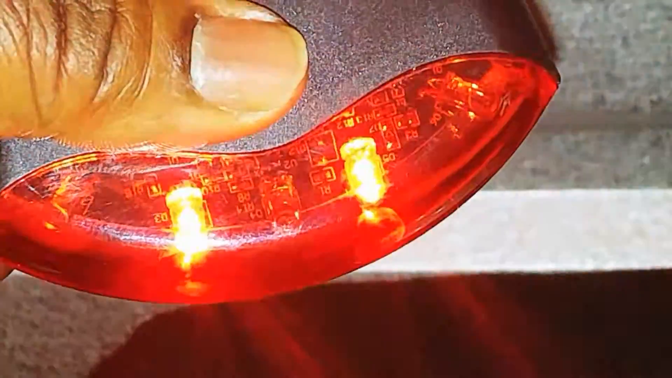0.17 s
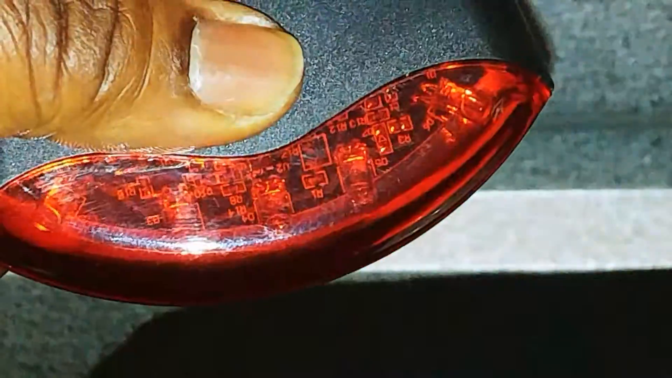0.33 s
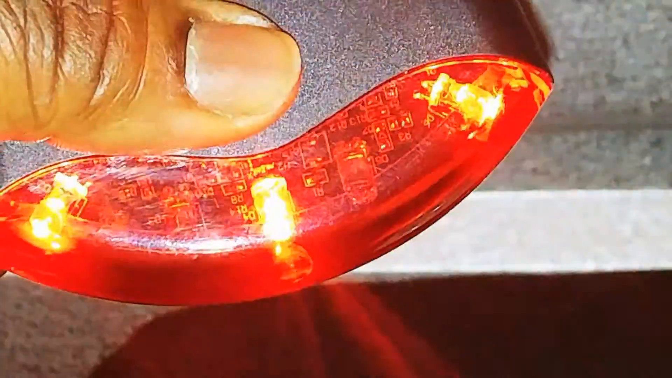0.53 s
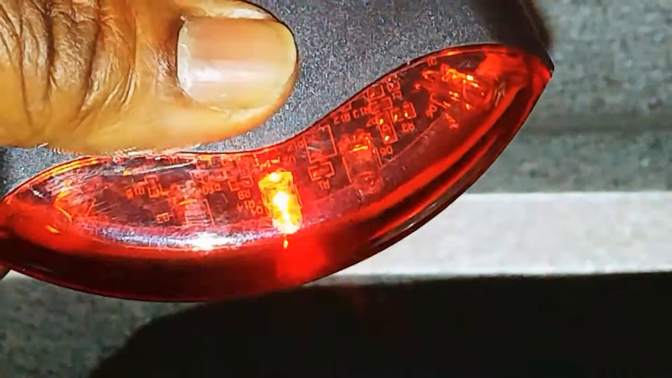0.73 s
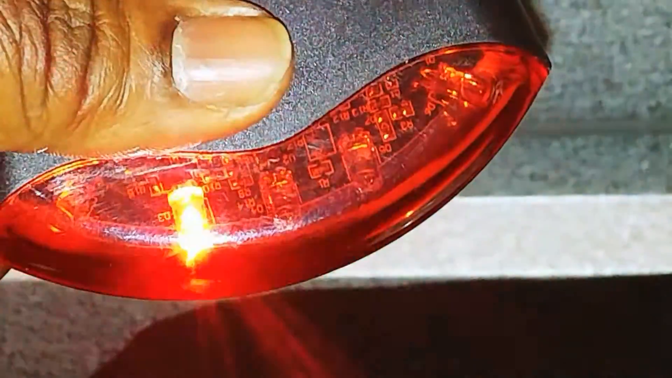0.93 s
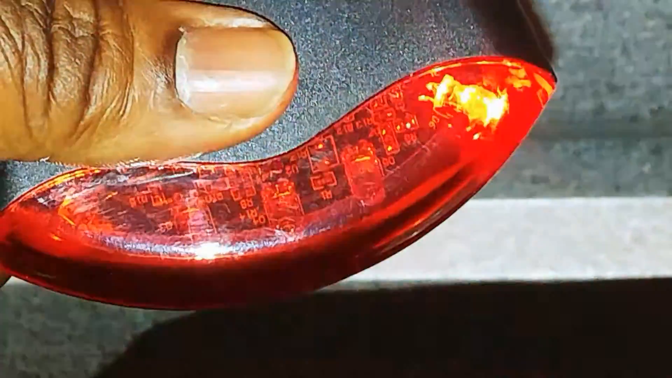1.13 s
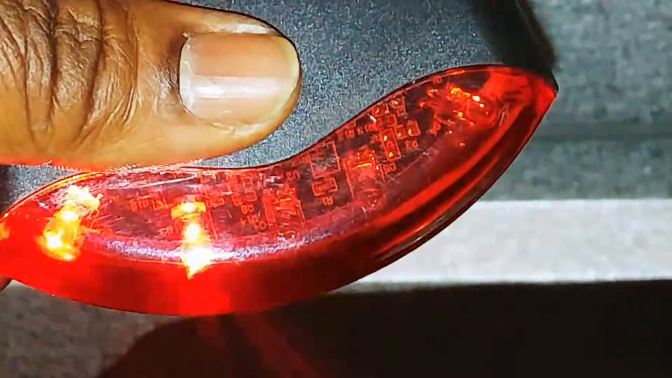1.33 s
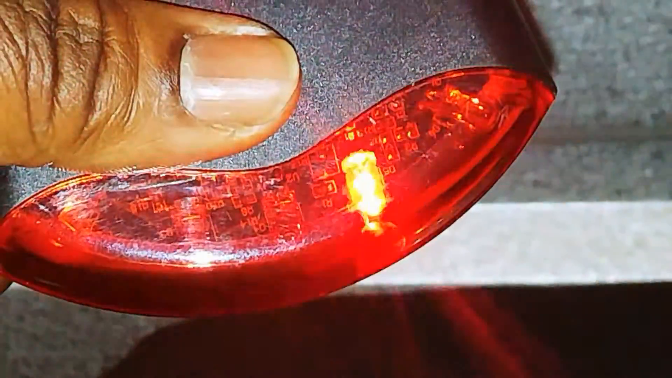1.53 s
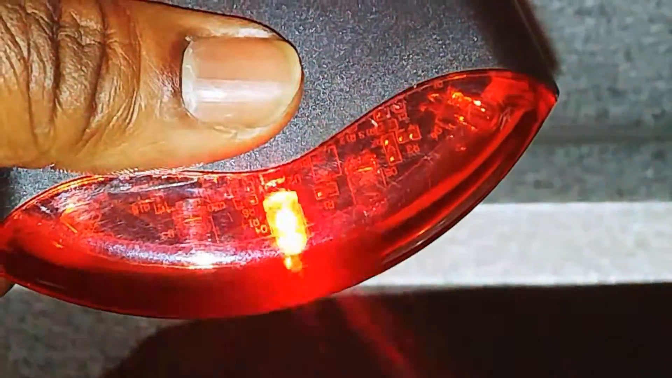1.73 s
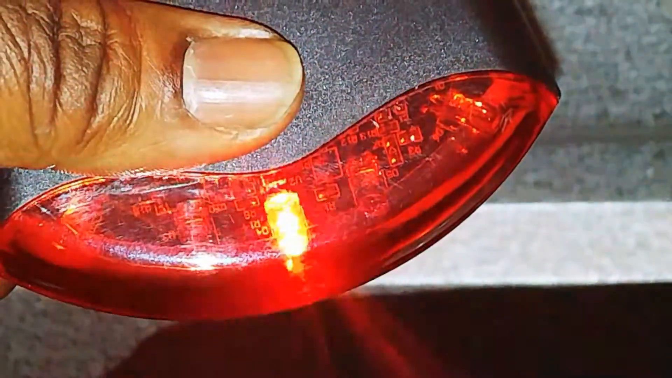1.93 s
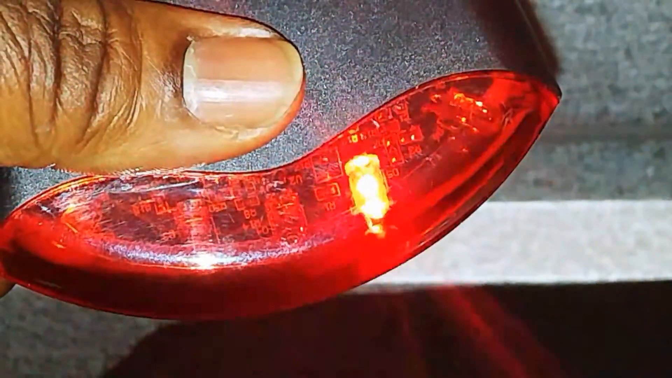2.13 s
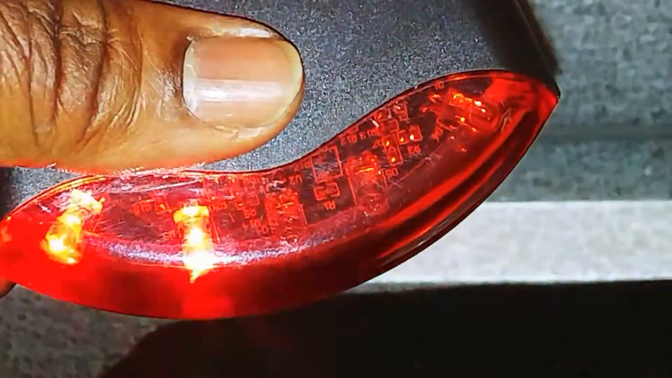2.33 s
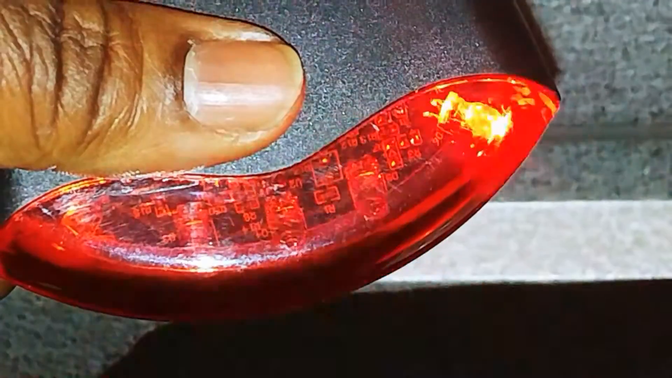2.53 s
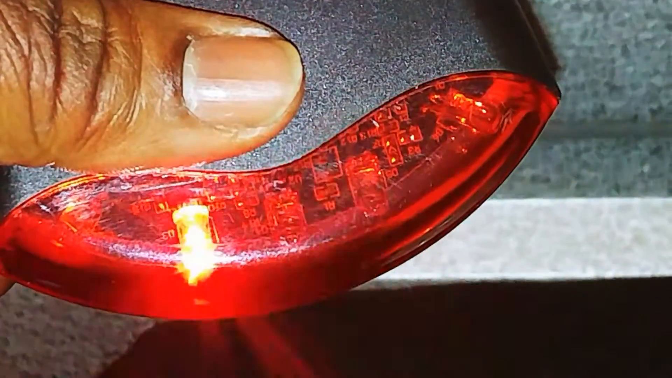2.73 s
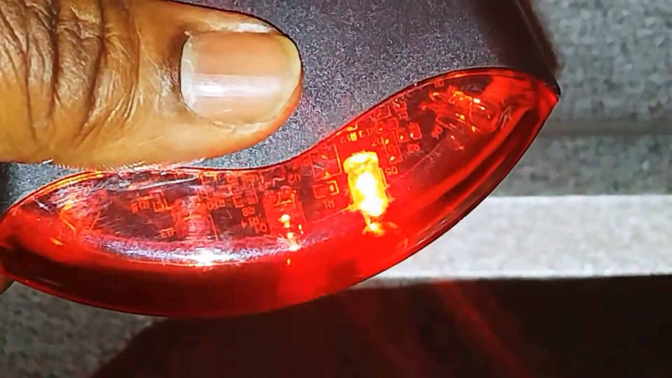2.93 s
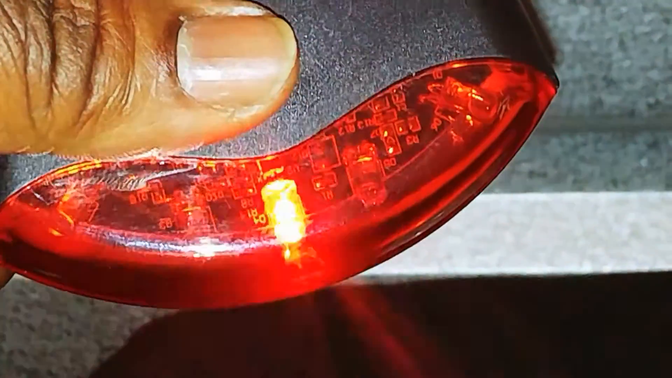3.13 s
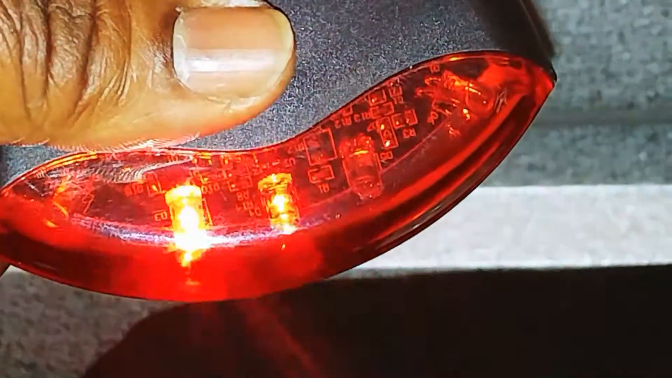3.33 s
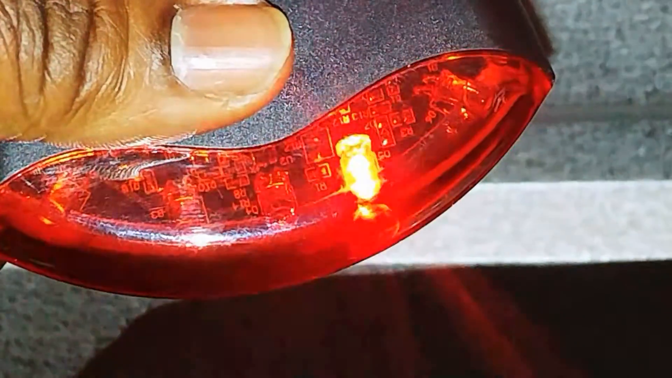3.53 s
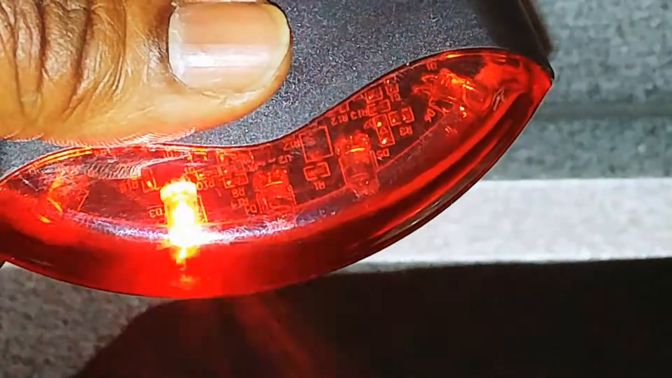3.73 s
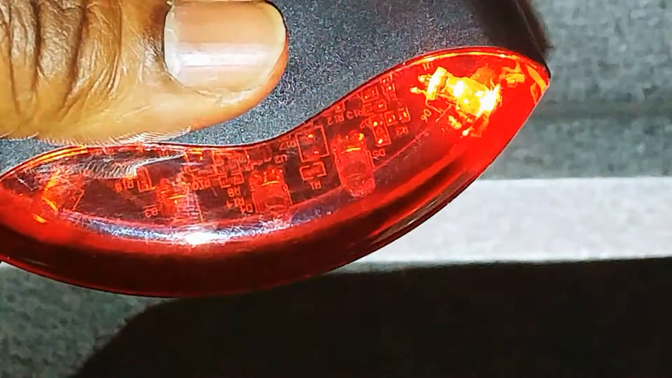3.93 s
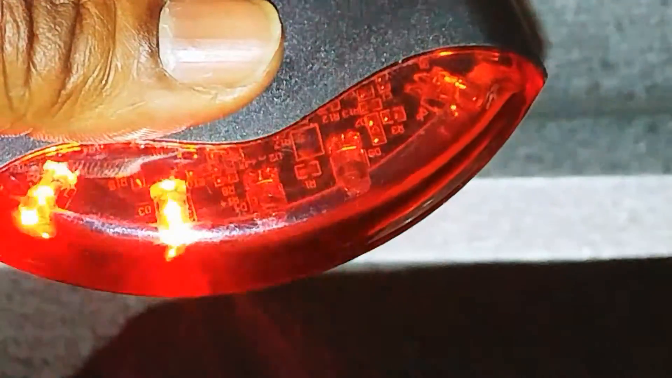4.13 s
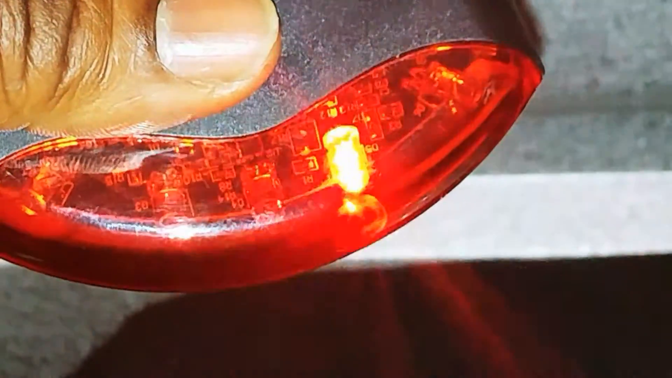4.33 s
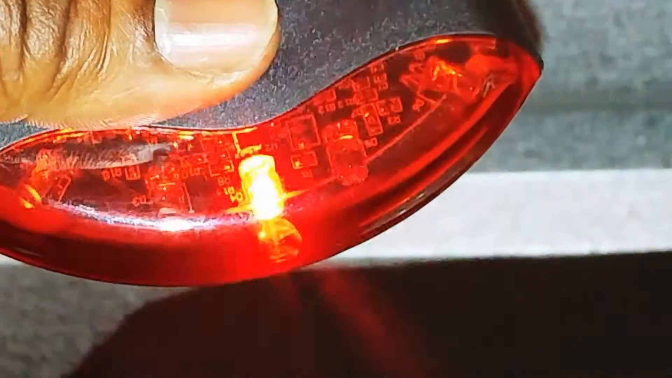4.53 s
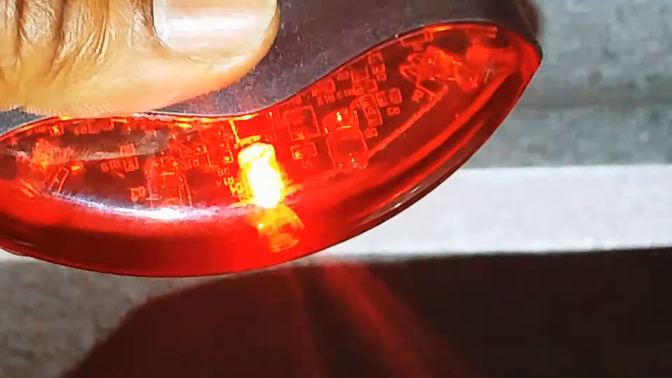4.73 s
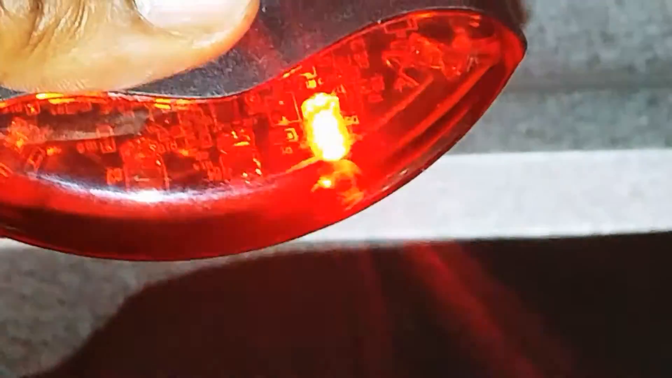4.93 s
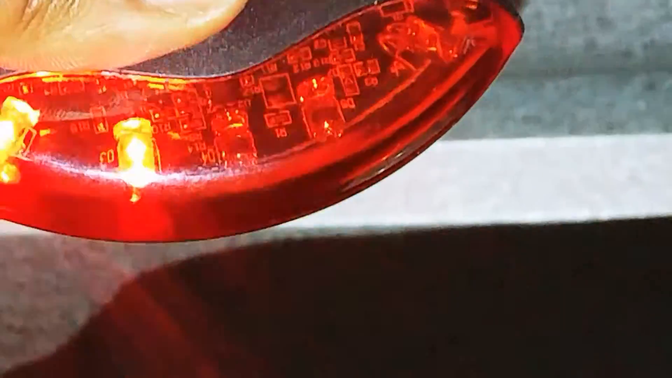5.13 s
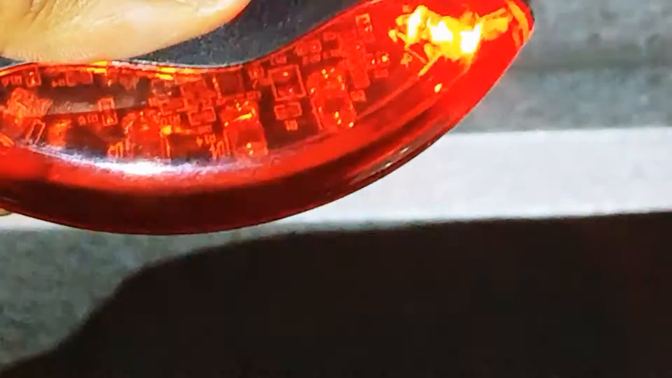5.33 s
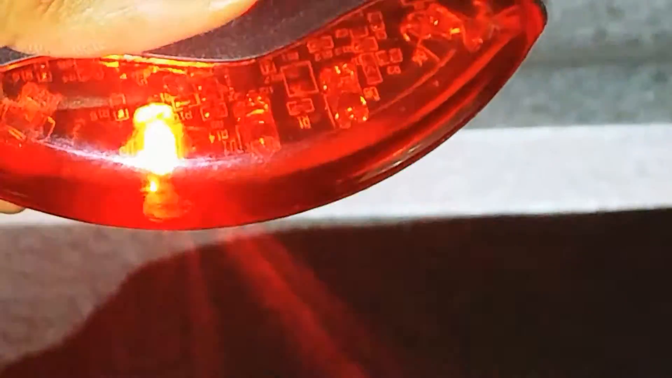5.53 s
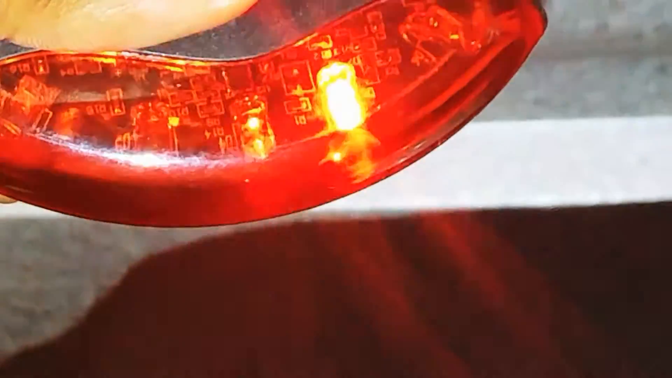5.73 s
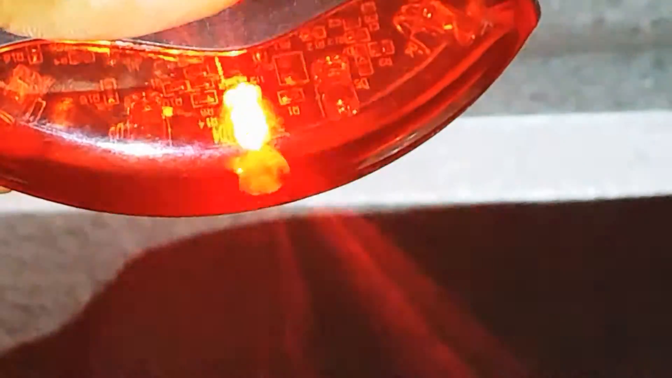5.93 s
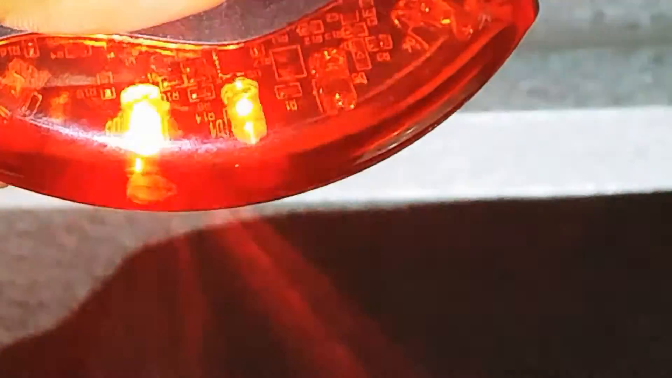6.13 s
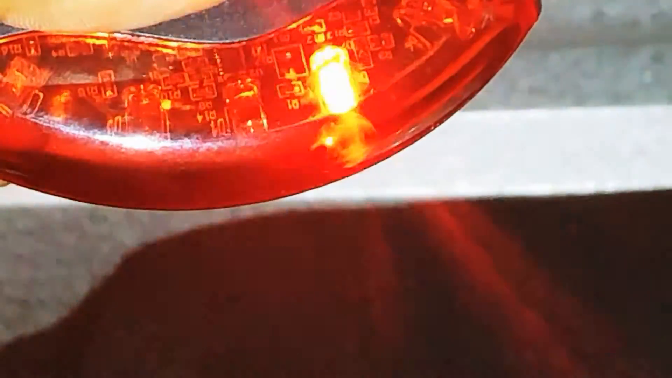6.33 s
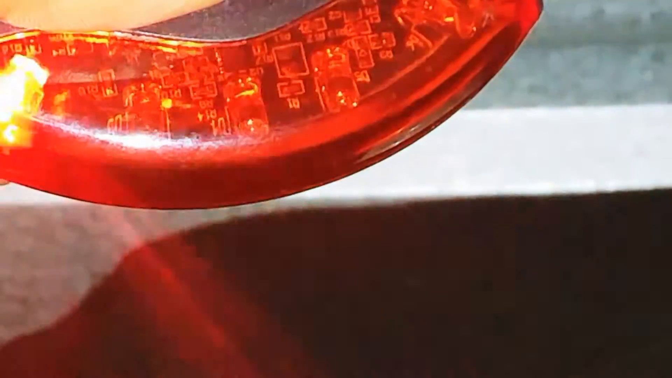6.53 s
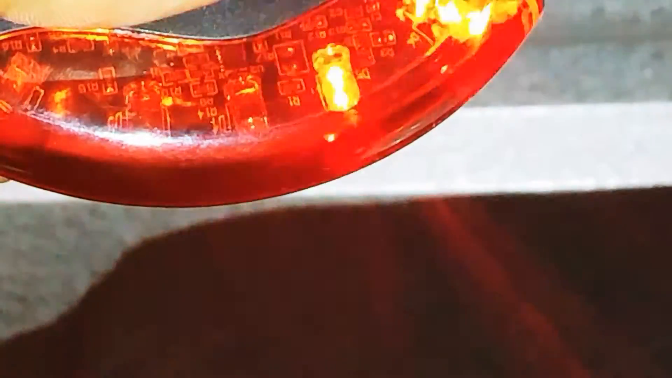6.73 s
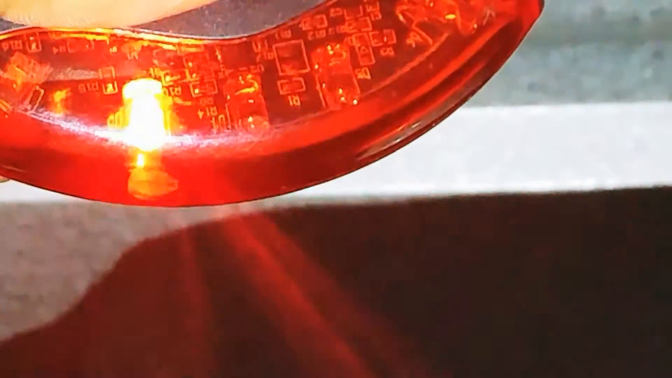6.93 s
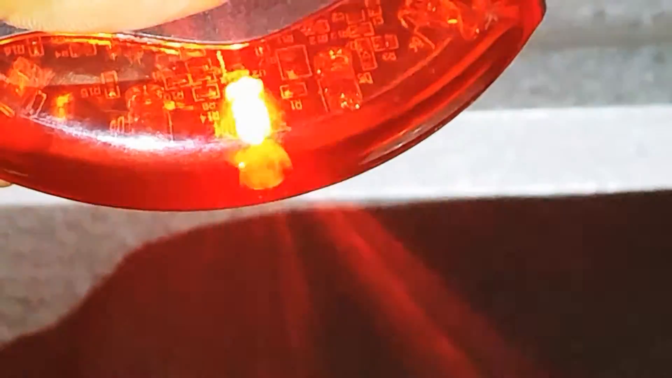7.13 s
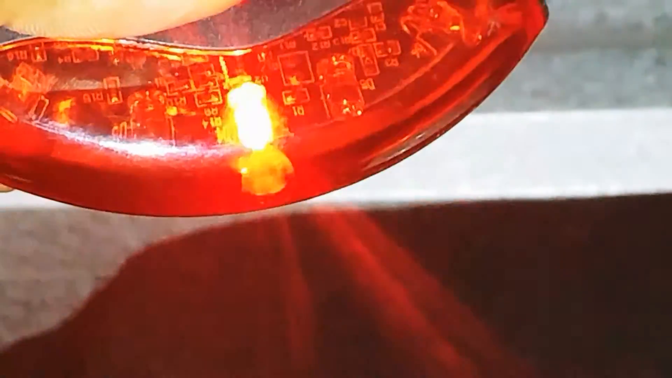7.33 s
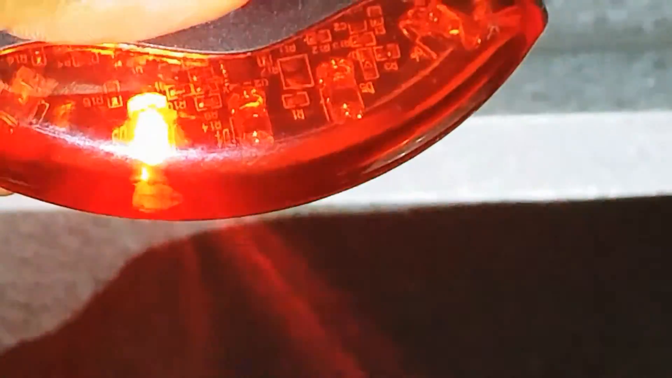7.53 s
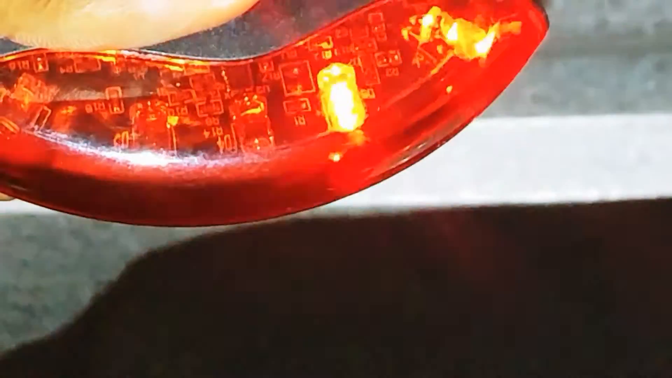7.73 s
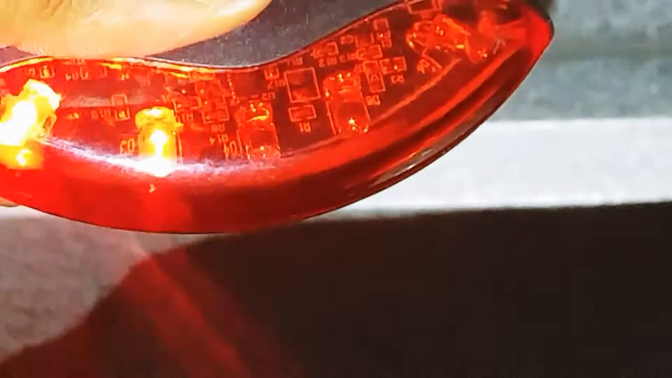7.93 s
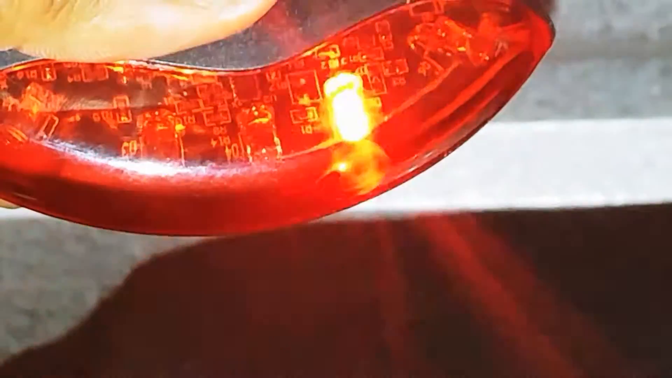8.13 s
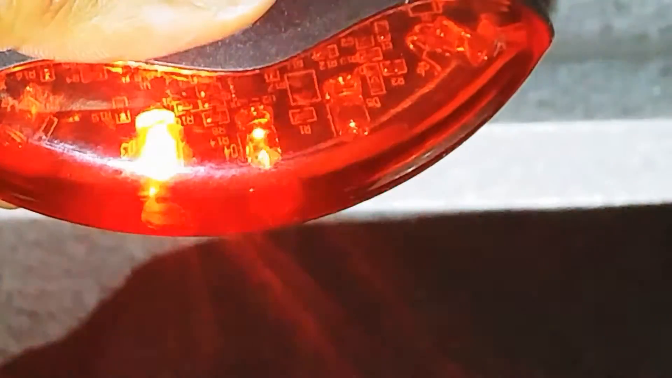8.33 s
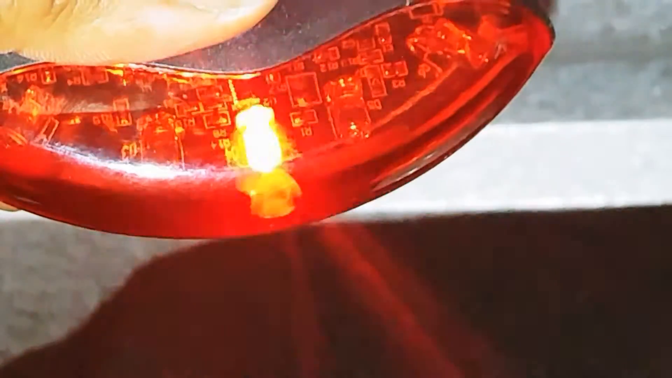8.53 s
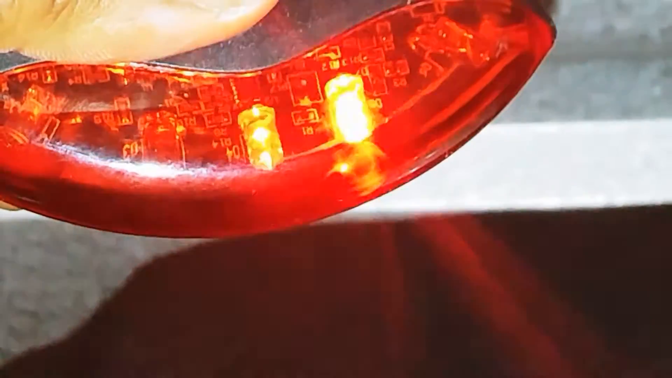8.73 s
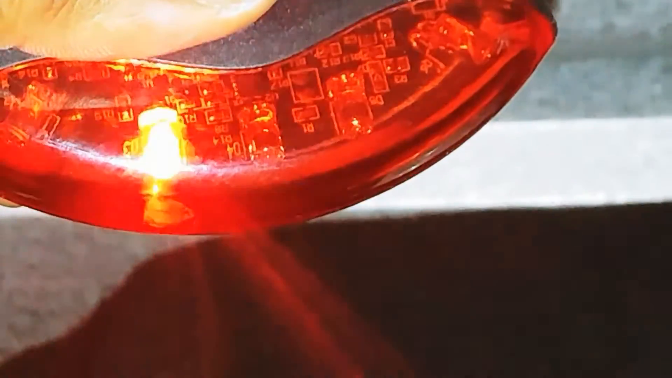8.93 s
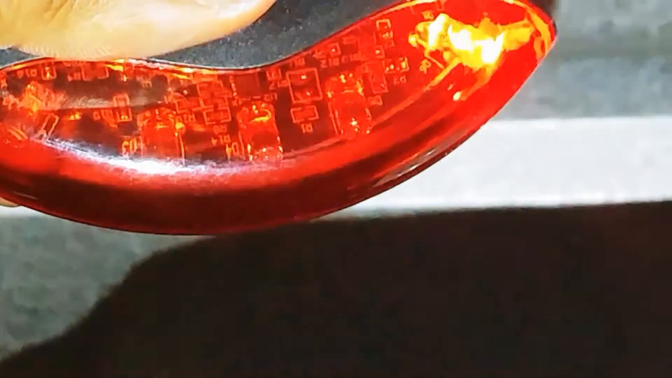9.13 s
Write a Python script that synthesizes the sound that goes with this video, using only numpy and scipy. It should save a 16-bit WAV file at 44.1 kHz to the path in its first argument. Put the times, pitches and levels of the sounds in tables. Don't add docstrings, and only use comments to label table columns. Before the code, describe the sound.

Two close button clicks, the first crisp and loud, the second duller, then a soft thumb rub over faint motor knocking, room rumble and hiss.

```python
import sys
import numpy as np
from scipy import signal
from scipy.io import wavfile
from scipy.ndimage import uniform_filter1d

SR = 44100
rng = np.random.default_rng(int(sys.argv[2]) if len(sys.argv) > 2 else 0)


def wav_out(sig):
    wavfile.write(sys.argv[1], SR, np.round(np.clip(np.atleast_2d(sig).T, -1, 1) * 32767).astype(np.int16))


def magnitude_from_level(level_db):
    exponent = np.asarray(level_db, float) / 20
    return 10 ** exponent


N = 408807

# start [s], level [dB]
PRESS_SNAPS = [
    (.1875, -15),
    (.1883, -13.5),
    (.1891, -22.5),
    (.1899, -23),
    (.1905, -25.5),
    (.1921, -22),
    (.1927, -22.5),
    (.1942, -31),
    (.1957, -29.5),
    (.1975, -34),
]
# start [s], level [dB]
RELEASE_SNAPS = [(.4643, -26.5), (.4657, -32), (.4669, -30.5), (.4692, -28.5), (.4702, -29.5), (.4716, -35),
                 (.4733, -30), (.4758, -32.5), (.4772, -36.5), (.4795, -35), (.4808, -39), (.4865, -41.5)]
# pitch [Hz], likeness [-1 to 1]
PORT_LIKENESS = [(60, 0.94), (130, 0.94), (290, 0.41), (640, 0.2), (1410, 0.0), (3100, -0.23),
                 (6820, -0.07), (15000, 0.51)]
# pitch [Hz], left minus right [dB]
PORT_BALANCE = [(60, 0), (110, -8), (200, -3), (380, -2.5), (700, -3.0), (1290, -3), (2380, -2),
                (4400, -4.5), (8120, -1), (15000, -1.5)]


def evened(x):
    return x / np.sqrt(np.mean(x ** 2) + 1e-30)


def read(points, hz):
    f, value = np.transpose(points)
    return np.interp(np.log(hz + 1), np.log(f + 1), value)


def curve(rows, column=1):
    rows = np.array(rows)
    return np.interp(np.arange(N) / SR, rows[:, 0], rows[:, column])


def sides(lean_db):
    return magnitude_from_level(np.array([lean_db / 2, -lean_db / 2]))


def train(s, db):
    x = np.zeros(N + SR)
    np.add.at(x, np.round(np.asarray(s) * SR).astype(int), magnitude_from_level(np.asarray(db)))
    return x[:N]


def spread(x, shape):
    return signal.oaconvolve(np.atleast_2d(x), np.atleast_2d(shape), axes=1)[:, :N]


def noise(colour, lean, same, patchy_db=0., low_db=-200.):
    hz = np.fft.rfftfreq(2048, 1 / SR)
    a, b, c, d, patches = rng.standard_normal((N // 512 + 6, 1025, 5)).T
    patches = evened(uniform_filter1d(uniform_filter1d(patches, 6, 0), 8, 1))
    like = np.clip(read(same, hz), -1, 1)
    left, right = sides(read(lean, hz))
    first = a + 1j * b
    second = like[:, None] * first + np.sqrt(1 - like[:, None] ** 2) * (c + 1j * d)
    z = np.array([first, second])
    mix_size = np.sqrt(left ** 2 + right ** 2 + 2 * like * left * right)
    z *= (np.array([left, right]) / mix_size)[:, :, None]
    inside = (hz >= colour[0][0]) & (hz <= colour[-1][0] * 1.03)
    z *= magnitude_from_level(np.where(inside, read(colour, hz), low_db)[:, None] + patchy_db * patches)
    x = signal.istft(z, nperseg=2048, noverlap=1536)[1][:, :N]
    return x / np.sqrt(np.mean(x.mean(0) ** 2))


def ring(modes, rise_s, scatter, lag_s, damping=1):
    t, out = np.arange(6000) / SR, 0
    for k, (hz, db, t60, *lean) in enumerate(modes):
        start_phase = np.pi * k + scatter * (2 * rng.random() - 1)
        phase = start_phase - 2 * np.pi * hz * np.array([[lag_s], [0]])
        fading = magnitude_from_level(db - 60 * damping * t / t60)
        out = out + sides(sum(lean))[:, None] * fading * np.sin(2 * np.pi * hz * t + phase)
    return out * (1 - np.exp(-t / rise_s))


def burst(rise_s, hold_s, fall_s):
    t = np.arange(6000) / SR
    return np.clip(t / rise_s, 0, 1) * np.exp(-np.maximum(t - rise_s - hold_s, 0) / fall_s)


def button():
    # pitch_hz [Hz], level_db [dB], time to fall by 60 dB [s], left minus right [dB]
    press_modes = [(650, -14, 0.028, -5), (800, -16, 0.012, -5.5), (1300, -17.5, 0.023, -6),
                   (1600, -15, .01, -4.5), (1950, -11, .006, -6.5), (2250, -9, .008, -6),
                   (2610, -6.5, 0.0087, -6), (2850, -4.5, 0.0076, -6.5), (3303, -6, .007, -6),
                   (3800, -9.5, .005, -8.5), (4236, -10.5, 0.0093, -9), (4650, -9, .006, -10.5),
                   (5380, -4, .008, -16), (5780, -3, .009, -16), (6100, -3.5, .008, -13.5),
                   (6310, -7.5, 0.011, -13), (7150, -5, .007, -8), (7734, -7, .007, -3),
                   (8463, -7.5, .007, 1.5), (12500, -21, .005, -9), (13500, -19.5, .005, -9),
                   (14800, -17.5, .006, -11)]
    release_modes = [(630, -14, 0.074, -4), (782, -10.5, 0.048, -6), (1060, 0, 0.011, -5),
                     (1300, 4, 0.014, -4), (1370, -11, 0.069, -10), (1590, -7.5, 0.023, -13),
                     (1757, -15, 0.053, -9), (2230, -4.5, 0.0068, -6), (2970, -22, 0.0075, -20)]
    tick_modes = [(3300, 3, .006, -1), (4200, -9, 0.0061, -9), (5400, 0.5, 0.0073, -10),
                  (6600, -2, .005, -13), (7900, 2, .008, -3)]
    tick_db = -47.5
    left_lag_s = .000034
    tick = ring(tick_modes, .0002, scatter=1.2, lag_s=left_lag_s)
    out = spread(train(*np.transpose(RELEASE_SNAPS[:1])), tick)
    out = magnitude_from_level(tick_db - RELEASE_SNAPS[0][1]) * out
    for snaps, modes, rise_s in ((PRESS_SNAPS, press_modes, .00015), (RELEASE_SNAPS, release_modes, .0005)):
        for s, db in snaps:
            rings = magnitude_from_level(db) * ring(modes, rise_s, scatter=1.2, lag_s=left_lag_s)
            out[:, round(s * SR):][:, :rings.shape[1]] += rings
    return out


def room(s, colour, build_s):
    # pitch_hz [Hz], time to fall by 60 dB [s]
    room_decay = [(400, 0.1), (1200, .2), (2000, 0.22), (6000, .42), (9000, .35), (15000, 0.24)]
    # pitch_hz [Hz], left minus right [dB]
    echo_balance = [(500, -3), (2000, -1.5), (4000, -4.5), (6000, -7), (8500, 1), (13000, -5.5)]
    end_s = .15
    taps = rng.choice([-1., 1.], (2, SR // 2)) * (rng.random((2, SR // 2)) < .25)
    hz, t, z = signal.stft(taps, SR, nperseg=256)
    z = z * magnitude_from_level(-60 * t / read(room_decay, hz)[:, None] - 12 * (t / end_s) ** 4)
    band_size = np.sqrt((abs(z) ** 2).sum(2).mean(0))
    gains = magnitude_from_level(read(colour, hz)) * sides(read(echo_balance, hz))
    z = z / band_size[:, None] * gains[:, :, None]
    tail = signal.istft(z / np.sqrt(128 * 1.5), SR, nperseg=256)[1]
    build_up = np.clip(np.arange(tail.shape[1]) / SR / build_s, 0, 1) ** 2
    return spread(train([s], [0]), tail * build_up)


def walls():
    # pitch_hz [Hz], level_db [dB]
    press_colour = [(400, -50.5), (700, -27.5), (1300, -26.5), (2000, -28), (3000, -24.5), (4300, -22.5),
                    (5500, -19.5), (6300, -17), (7500, -23), (8700, -28.5), (9600, -59), (11000, -57.5),
                    (12500, -41), (15000, -41.5)]
    release_colour = [(400, -39), (750, -12), (1050, -30), (1450, -15), (1750, -22), (2300, -36.5),
                      (3500, -46), (5500, -45), (8000, -52), (10000, -61), (15000, -48)]
    press = magnitude_from_level(2.5) * room(PRESS_SNAPS[0][0], press_colour, build_s=0.0087)
    release = magnitude_from_level(-2.5) * room(RELEASE_SNAPS[0][0], release_colour, build_s=0.0051)
    return press + release


def thumb():
    # time_s [s], level_db [dB]
    slide = [
        (.5, -73.5),
        (.56, -64.5),
        (.6, -50),
        (.63, -52),
        (.67, -59),
        (.72, -60.5),
        (.8, -63),
        (.92, -68.5),
        (1.05, -74),
    ]
    # pitch_hz [Hz], level_db [dB per Hz]
    slide_colour = [(60, -13), (130, -2), (300, -0.5), (700, -8.5), (1200, -20), (2500, -36), (6000, -44.5)]
    return magnitude_from_level(curve(slide)) * noise(slide_colour, PORT_BALANCE, PORT_LIKENESS, patchy_db=2.5)


def extra(rows, count, first_turn_s, turn_s):
    out = np.zeros(count)
    for s, db in rows:
        out[round((s - first_turn_s) / turn_s)] += db
    return out


def turns_of_motor():
    # time_s [s], extra_db [dB]
    load = [(0, -0.5), (1.5, 0.2), (4, 0), (5, 2.5), (6.5, -2), (7.6, 3.2), (8.3, -2), (9.27, -1.2)]
    # start_s [s], extra_db [dB]
    bind_turns = [(.354, 10), (.99, 10), (1.149, 7), (1.785, 4.5), (3.057, 7), (3.216, 3.5), (3.852, 8.5),
                  (4.329, 6.5), (4.647, 8.5), (4.806, 11), (5.124, 8), (5.76, 9.5), (6.237, 5.5),
                  (7.827, 11), (8.463, 7), (8.622, 11)]
    # start_s [s], extra_db [dB]
    catch_turns = [(.99, 2.5), (1.785, 2), (2.58, 5), (3.216, 3), (4.17, 4.5), (4.488, 5), (4.806, 1.5),
                   (8.463, 5)]
    first_turn_s, turn_s = .036, .159
    scrape_per_bind = 0.12
    s = np.arange(first_turn_s, N / SR, turn_s)
    usual_db = np.array([-70, -84.5, -71.5, -75.5, -80])
    stray_db = np.array([1.44, 2.5, 1.1, 1.8, 1.5])
    db = usual_db + stray_db * rng.standard_normal((len(s), 5))
    db = db + np.interp(s, *np.transpose(load))[:, None]
    binds = extra(bind_turns, len(s), first_turn_s, turn_s)
    db[:, 4] = np.where(binds > 0, usual_db[4] + binds, db[:, 4])
    db[:, 3] += scrape_per_bind * binds
    db[:, 2] += extra(catch_turns, len(s), first_turn_s, turn_s)
    return (s, *db.T)


def back_knock(s, db):
    # delay_s [s], level_db [dB]
    knock_paths = [
        [(.001, -7), (.010, -1), (.031, -13), (.042, -13)],
        [(0, 0), (.011, -7), (.027, -7), (.04, -16)],
    ]
    # pitch_hz [Hz], level_db [dB], time to fall by 60 dB [s]
    back_modes = [(1480, -3, .045), (1600, 0, .045), (1115, -16, .08), (5200, -15, .03), (2400, -15, .03)]
    paths = np.array([train(*np.transpose(port))[:3000] for port in knock_paths])
    knock = spread(spread(train(s, db), paths), ring(back_modes, rise_s=0.00067, scatter=0, lag_s=.0001))
    return magnitude_from_level(12.5) * sides(-1.0)[:, None] * knock


def forward_knock(s, db):
    # pitch_hz [Hz], level_db [dB], time to fall by 60 dB [s]
    forward_modes = [(1129, -1.5, .1), (1466, 0, .1), (1593.7, 2, 0.066), (1868, -10.5, .05),
                     (2543, -5, 0.017)]
    hits = .06 + rng.choice([-1., 1.], (2, N))
    chatter = spread(train(s, db), burst(.003, 0.0098, .012)) * hits
    rings = ring(forward_modes, rise_s=.001, scatter=0, lag_s=0)
    return magnitude_from_level(-20.5) * sides(-5.0)[:, None] * spread(chatter, rings)


def scraping(back_s, forward_s, db):
    # pitch_hz [Hz], level_db [dB]
    scrape_colour = [(900, -24), (1300, -1.5), (2000, 3.5), (3100, 2), (4300, 0), (5300, -2), (6500, -2.5),
                     (7300, -5), (9000, -19.5), (15000, -15)]
    # pitch_hz [Hz], left minus right [dB]
    scrape_balance = [(1000, 3.5), (3000, -5.5), (6000, -11), (9000, -2)]
    strokes = spread(train(forward_s, db), burst(0.011, 0.015, 0.028))
    strokes += magnitude_from_level(-11.5) * spread(train(back_s, db), burst(0.0097, .022, 0.016))
    unlike = [(1000, 0), (9000, 0)]
    return magnitude_from_level(2.5) * strokes * noise(scrape_colour, scrape_balance, unlike, patchy_db=3)


def whining(back_s, back_db, forward_s, forward_db):
    # pitch_hz [Hz], width_hz [Hz], level_db [dB]
    whine_bands = [(7700, 150, -2.5), (8000, 250, -1)]
    strokes = spread(train(forward_s + .006, forward_db), burst(0.0051, 0.007, 0.024))
    strokes += spread(train(back_s + .008, back_db), burst(.005, 0.0063, .018))
    drive = rng.standard_normal((2, N))
    narrow = 0
    for hz, width, db in whine_bands:
        band = signal.butter(2, [hz - width / 2, hz + width / 2], "band", fs=SR, output="sos")
        narrow = narrow + magnitude_from_level(db) * signal.sosfilt(band, drive)
    return magnitude_from_level(1.5) * strokes * evened(narrow) * sides(1.0)[:, None]


def motor():
    back_s, back_db, back_whine_db, forward_db, scrape_db, whine_db = turns_of_motor()
    forward_s = back_s + .078
    out = back_knock(back_s, back_db) + forward_knock(forward_s, forward_db)
    out += scraping(back_s, forward_s, scrape_db)
    return out + whining(back_s, back_whine_db, forward_s, whine_db)


def mains_hum():
    # time_s [s], extra_db [dB], width_s [s]
    surges = [(.66, 11, 0.13), (1.55, -12, 0.093), (1.94, -6, .1), (2.17, 5.5, 0.058), (2.81, 9, 0.064),
              (4.3, 7, 0.031), (4.51, 10, 0.03), (4.72, 8.5, 0.042), (4.95, -16, 0.071),
              (5.91, 11.5, 0.029), (5.99, -14, 0.034), (7.25, -10, 0.13), (7.45, 5, 0.053),
              (8.5, -11.5, 0.14)]
    hum_hz, hum_db, wander_hz = 119.7, -59, 0.89
    fourth_hz, fourth_db = 479.5, -79.5
    t = np.arange(N) / SR
    slow_waves = [np.sin(2 * np.pi * (f * t + rng.random())) for f in np.geomspace(.3, 5, 8)]
    wander = evened(sum(slow_waves))
    phase = 2 * np.pi * np.cumsum(hum_hz + wander_hz * wander) / SR
    surge_db = sum(db * np.exp(-((t - s) / width) ** 2) for s, db, width in surges)
    hum = np.sqrt(2) * magnitude_from_level(hum_db + surge_db) * np.sin(phase)
    fourth = np.sqrt(2) * magnitude_from_level(fourth_db) * np.sin(2 * np.pi * fourth_hz * t)
    return (hum + fourth) * sides(-3.0)[:, None]


def air():
    # pitch_hz [Hz], level_db [dB per Hz]
    rumble_colour = [(20, -37.5), (31, -32.5), (39, -22.5), (50, -19), (62, -10), (79, 3), (90, 6),
                     (105, -12), (125, -2), (160, -8), (250, -14), (310, -19.5), (480, -23), (700, -38)]
    hiss_colour = [(200, 0.5), (500, -3), (700, 0.5), (900, -1.5), (980, -7), (1300, -7), (2500, -13),
                   (5000, -17), (8000, -21.5), (10500, -27), (13000, -22), (15600, -19.5)]
    # time_s [s], level_db [dB]
    swell = [(0, -56), (.45, -55.5), (.72, -50.5), (1.0, -52), (1.6, -56.5), (2.2, -55.5), (3.4, -53.5),
             (4.75, -54.5), (4.92, -59.5), (5.06, -54), (5.6, -58), (6.2, -54.5), (6.5, -56.5), (8.8, -57),
             (9.27, -54)]
    left_lag = 6
    rumble = noise(rumble_colour, PORT_BALANCE, PORT_LIKENESS, patchy_db=1.0)
    low = magnitude_from_level(curve(swell) + 2.0) * rumble + mains_hum()
    low = np.array([np.roll(low[0], left_lag), low[1]])
    return low + magnitude_from_level(-70) * noise(hiss_colour, PORT_BALANCE, PORT_LIKENESS, patchy_db=1.7)


def scene():
    notch = signal.butter(1, [9500, 11300], "bandstop", fs=SR, output="sos")
    clicks = signal.sosfilt(notch, button() + walls())
    return clicks + thumb() + motor() + air()


def band_limit(x):
    return signal.sosfilt(signal.butter(12, 16810, fs=SR, output="sos"), x)


def record(dry):
    bass_cut = signal.butter(3, 48, "high", fs=SR, output="sos")
    dry = signal.sosfilt(bass_cut, dry)
    edge = signal.firwin(401, 15900, window=("kaiser", 7), fs=SR)
    mix = signal.oaconvolve(dry, edge[None], "same", axes=1)
    return band_limit(mix)


dry = scene()
out = record(dry)
wav_out(out)
```